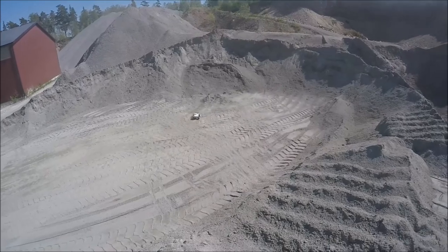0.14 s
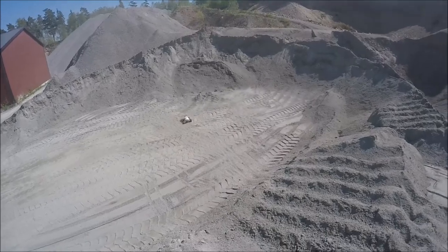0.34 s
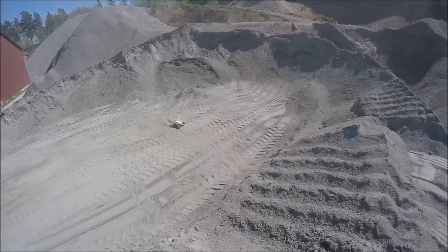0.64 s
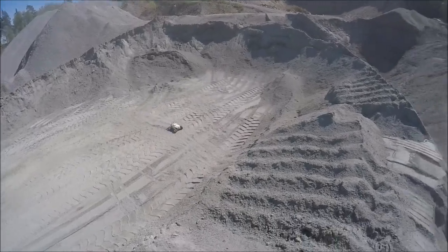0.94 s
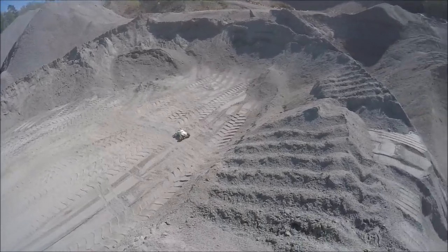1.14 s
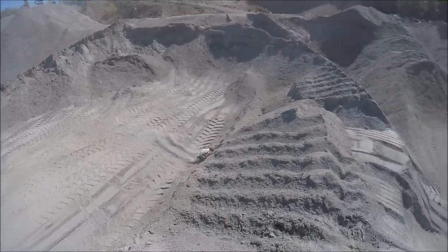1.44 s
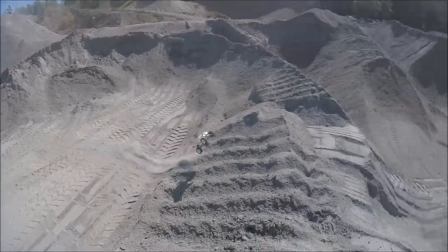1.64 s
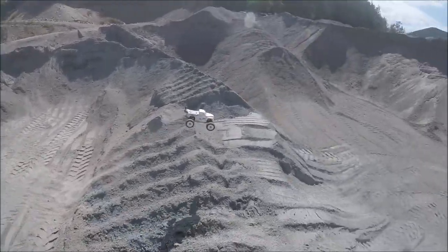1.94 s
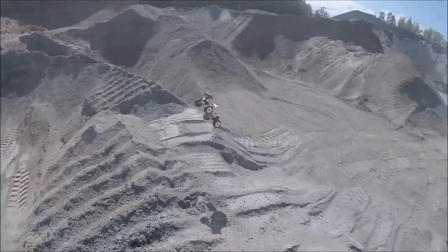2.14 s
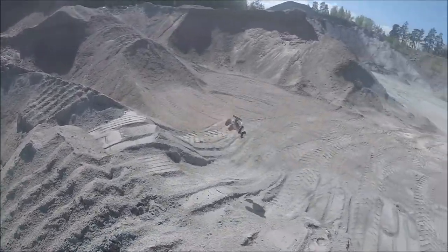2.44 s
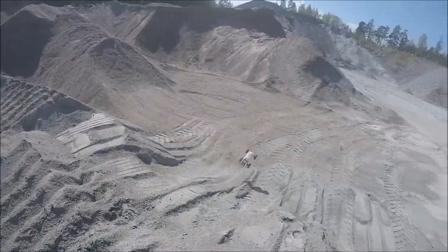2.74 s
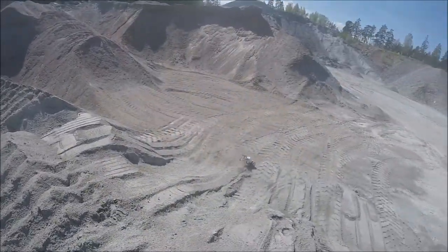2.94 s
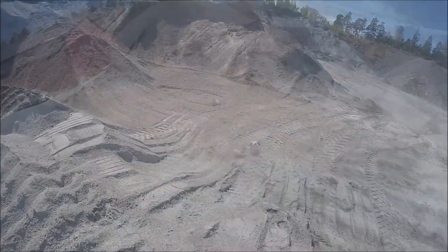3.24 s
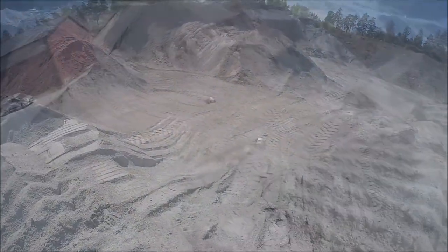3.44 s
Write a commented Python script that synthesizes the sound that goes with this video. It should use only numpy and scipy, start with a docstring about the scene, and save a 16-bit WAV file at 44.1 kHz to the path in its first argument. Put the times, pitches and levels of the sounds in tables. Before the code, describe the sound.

A small electric model truck rattles and whines over gravel as wind buffets the microphone.

```python
"""Wind thuds on the microphone, over a faint hiss, as a small electric model truck rattles over a gravel pit.
The truck jumps a heap with the throttle cut, revs in the air and lands. Impacts of its gear teeth excite
the resonances of the plastic chassis; gears and shafts whine, mostly gliding upward, and the motor
controller gives a thin high squeal under hard throttle. The gravel walls return a short echo, and a
stronger gust sets in near the end."""
import sys
import numpy as np
from scipy import signal
from scipy.fft import rfft, irfft
from scipy.io import wavfile
from scipy.ndimage import uniform_filter1d

SR = 44100
rng = np.random.default_rng(int(sys.argv[2]) if len(sys.argv) > 2 else 0)


def unload_wav(signal):
    """Save mono or channel-first audio to the path in sys.argv[1] as 16-bit WAV at rate SR, clipped to [-1, 1]."""
    wavfile.write(
        sys.argv[1],
        SR,
        np.round(np.clip(np.atleast_2d(signal).T, -1, 1) * 32767).astype(np.int16),
    )


N = 158760

# Midrange chassis modes. Each row: frequency in Hz, bandwidth in Hz, relative gain in dB.
MID_MODES = [(2393, 134, -4.5), (2582, 49, -13.5), (3098, 297, -2.5), (3595, 203, 5), (3776, 481, -1),
             (4106, 280, -5), (4525, 140, -8), (5295, 430, -18.5)]


def amp(db):
    """Amplitude ratio of a level in decibels."""
    return 10 ** (np.asarray(db) / 20)


def unit_rms(x):
    """Normalisation to unit mean power."""
    return x / np.sqrt(np.mean(x ** 2) + 1e-20)


def envelope(table, column):
    """Linear interpolation of one column of a time table at every sample."""
    rows = np.array(table)
    return np.interp(np.arange(N) / SR, rows[:, 0], rows[:, column])


def coloured_noise(spectrum):
    """Spectral shaping of white noise, interpolated over log frequency."""
    corner_hz, db = np.transpose(spectrum)
    hz = np.fft.rfftfreq(N, 1 / SR)
    shape_db = np.interp(np.log(hz + 1), np.log(corner_hz + 1), db, left=-80, right=-80)
    return unit_rms(irfft(rfft(rng.standard_normal(N)) * amp(shape_db), N))


def wobble(seconds):
    """Low-pass noise: a random curve of unit RMS, smooth over the given time."""
    size = max(int(seconds * SR), 1)
    return unit_rms(uniform_filter1d(uniform_filter1d(rng.standard_normal(N), size), size))


def resonate(x, hz, width_hz, stages=2):
    """Heterodyne band-pass: each stage shifts the frequency hz to zero, smooths and shifts back."""
    carrier = np.exp(2j * np.pi * np.cumsum(hz * np.ones(len(x))) / SR)
    pole = np.exp(-np.pi * width_hz / SR)
    for _ in range(stages):
        x = 2 * (carrier * signal.lfilter([1 - pole], [1, -pole], x / carrier)).real
    return x


def hiss(hiss_db=-66, tone_hz=8600, tone_db=-88):
    """Broadband noise is heard as faint hiss, narrowband noise as a thin wavering tone."""
    # Hiss spectrum. Each row: frequency in Hz, relative spectral density in dB.
    spectrum = [(120, -3.5), (200, -9), (488, -9.5), (1130, -15.5), (1780, -17.5), (2510, -17.5),
                (8660, -23.5), (15500, -31.5)]
    tone = resonate(rng.standard_normal(N), tone_hz, width_hz=40, stages=1)
    noise = coloured_noise(spectrum) * amp(1.2 * wobble(0.038))
    return amp(hiss_db) * unit_rms(noise) + amp(tone_db) * unit_rms(tone)


def wind(gust_db=3.5, gust_s=0.023):
    """Turbulent pressure on the microphone gives low thuds and lumpy flutter."""
    # Wind before and during the stronger gust. Each row: time in seconds, thud and flutter levels in dB.
    breeze, gust = [
        [(0.0, -35.5, -62), (0.07, -46, -61.5), (0.78, -40, -60.5), (1.14, -47.5, -59), (1.61, -30.5, -55.5),
         (1.68, -36.5, -58.5), (2.58, -37, -60.5), (2.69, -33, -57), (2.8, -33, -58)],
        [(2.83, -32, -41), (2.872, -27, -38), (2.984, -28.5, -41), (3.008, -36, -39), (3.076, -32, -42),
         (3.16, -20, -43.5), (3.212, -28.5, -48.5), (3.388, -30.5, -40), (3.6, -37, -49)],
    ]
    # Spectra of the two bands. Each row: frequency in Hz, relative spectral density in dB.
    thud_spectrum = [(4.7, -7.5), (8.0, 4.5), (21, 1), (32, -2), (54, -16), (88, -26.5), (120, -65),
                     (160, -60), (200, -80)]
    flutter_spectrum = [(29, -45), (50, 0), (92, -3), (146, -12.5), (269, -20), (439, -25), (600, -48),
                        (780, -127)]
    levels = breeze + gust
    flutter = unit_rms(coloured_noise(flutter_spectrum) * amp(gust_db * wobble(gust_s)))
    thuds = coloured_noise(thud_spectrum)
    return amp(envelope(levels, 1)) * thuds + amp(envelope(levels, 2)) * flutter


def buffets(settle_hz=26, settle_s=.01):
    """Abrupt pushes of wind on the microphone are damped oscillations that sag in pitch."""
    # Each row: start in seconds, peak level in dB, initial frequency in Hz, 60 dB decay time in seconds.
    pushes = [(2.823, -21, 75, .07), (3.003, -15.5, 44, .4)]
    out, t = np.zeros(N), np.arange(SR // 3) / SR
    for start, db, hz, t60 in pushes:
        first = round(start * SR)
        cycles = settle_hz * t + (hz - settle_hz) * settle_s * (1 - np.exp(-t / settle_s))
        out[first:first + len(t)] += amp(db - 60 * t / t60) * np.sin(2 * np.pi * cycles)
    return out


def pit_echo(direct, echo_db=-15.5, t60_s=0.15, delay_s=.008):
    """Diffuse reflection from the gravel walls adds an exponentially decaying tail."""
    t = np.arange(SR // 2) / SR
    tail = rng.standard_normal(len(t)) * amp(-60 * t / t60_s) * (t > delay_s)
    return direct + amp(echo_db) * signal.fftconvolve(direct, tail / np.linalg.norm(tail))[:N]


def chassis(force, modes, swell_db=2.2, wander_s=.03):
    """Modal superposition: resonances of alternating sign swell and fade at random as the truck turns."""
    out = np.zeros(N)
    for k, (centre_hz, width_hz, db) in enumerate(modes):
        hz = centre_hz * (1 + .012 * wobble(wander_s))
        gain = (-1) ** k * amp(db + swell_db * wobble(wander_s))
        out += gain * resonate(force, hz, 1.7 * width_hz)  # two wide stages make one narrower peak
    return unit_rms(out)


def jolts(decay_s=.004):
    """Shock excitation: each jolt is a fast-decaying burst of noise coloured by the chassis modes."""
    # Each row: start in seconds, initial level in dB.
    shocks = [(.32, -55.5), (0.433, -48.5), (1.9402, -54), (2.0033, -58.5), (2.0986, -64), (2.2913, -54),
              (2.368, -37.5), (2.4987, -35), (2.928, -39)]
    t, noise = np.arange(N) / SR, rng.standard_normal(N)
    bursts = sum(amp(db) * (t > start) * np.exp(-np.maximum(t - start, 0) / decay_s)
                 for start, db in shocks)
    return bursts * chassis(noise, MID_MODES)


def controller_squeal(hz=15080, width_hz=220, ramp_s=.02):
    """Switching in the motor controller gives a high narrowband fizz under hard throttle."""
    # Each row: start in seconds, duration in seconds, level in dB.
    spells = [(1.374, 0.31, -68), (2.38, .44, -65), (3.098, 0.16, -70)]
    t = np.arange(N) / SR
    gate = sum(amp(db) * np.clip(np.minimum(t - start, start + length - t) / ramp_s, 0, 1)
               for start, length, db in spells)
    fizz = resonate(rng.standard_normal(N), hz, width_hz)
    return gate * unit_rms(fizz * amp(2.1 * wobble(0.014)))


def whines(rasp_hz=4200, rasp_glide_hz=450):
    """Periodic motion of gears and shafts gives tones; the higher and the wider the glide, the raspier."""
    # Each row: start and duration in seconds, first and last frequency in Hz, level in dB.
    glides = [(0.543, 0.13, 2334, 2557, -58.5), (0.594, 0.37, 7400, 7840, -68.5),
              (1.103, .08, 6670, 6200, -64.5), (1.22, 0.092, 8700, 12700, -72),
              (1.316, 0.12, 4300, 7900, -53.5), (1.32, 0.29, 1450, 1493, -55.5),
              (1.368, 0.42, 7050, 7400, -54), (1.374, 0.078, 2410, 3130, -46.5),
              (1.454, 0.17, 3770, 4020, -41.5), (1.458, 0.062, 4490, 4600, -40.5),
              (1.659, 0.1, 1069, 1013, -53.5), (1.643, 0.08, 4570, 4400, -45.5),
              (1.697, 0.11, 3040, 2970, -55.5), (2.393, 0.16, 1283, 1510, -48),
              (2.408, 0.07, 6820, 7350, -42.5), (2.42, 0.2, 3480, 3550, -40.5),
              (2.447, 0.041, 7400, 10100, -52.5), (2.435, 0.11, 509, 691, -51.5),
              (2.476, 0.088, 1613, 1716, -46), (2.753, 0.057, 3970, 4180, -47.5),
              (3.117, 0.07, 4600, 9300, -47.5), (3.164, 0.056, 2350, 2300, -50.5)]
    out = np.zeros(N)
    noise = rng.standard_normal(N)
    for start, length, from_hz, to_hz, db in glides:
        first, n = round(start * SR), round(length * SR)
        progress = np.arange(n) / n
        hz = from_hz + (to_hz - from_hz) * progress
        glide_hz = abs(to_hz - from_hz)
        rasp = unit_rms(resonate(noise[first:first + n], hz, width_hz=.027 * from_hz + .16 * glide_hz))
        rasp_gain = (from_hz / rasp_hz) ** 3 + glide_hz / rasp_glide_hz + .6
        tone = np.sin(2 * np.pi * np.cumsum(hz) / SR)
        swell = np.sin(np.pi * progress ** .7) ** .7
        out[first:first + n] += amp(db) * swell * unit_rms(tone + rasp_gain * rasp)
    return out * amp(1.5 * wobble(.008))


def gear_rattle(teeth_per_s=5000, spread_db=1.5, clump_db=1, clump_s=0.0075):
    """Impulse excitation: dense, uneven clicks of the gear teeth ring the chassis in four bands."""
    # Each row: time in seconds, midrange level in dB, low band and treble in dB relative to it.
    drive = [(0.01, -56, -16.5, -16), (0.15, -70, -5, -16), (0.17, -51, -15, -20),
             (0.265, -56.5, -14.5, -16), (0.29, -65, -11, -13), (0.415, -68.5, -6, -10),
             (0.44, -53.5, -12, -16.5), (0.62, -53.5, -11, -16.5), (0.76, -48.5, -14, -17.5),
             (0.83, -48, -14.5, -17), (1.21, -52, -12, -15.5), (1.33, -45, -15, -15.5),
             (1.38, -42, -10, -12.5), (1.45, -37, -11.5, -14), (1.57, -39.5, -15.5, -11.5),
             (1.59, -44, -10, -10), (1.69, -36, -17, -19), (1.82, -74.5, 3, -10), (2.31, -76, -2.5, -8),
             (2.35, -43.5, -9.5, -30), (2.38, -36.5, -13.5, -16), (2.41, -41.5, -19, -14.5),
             (2.44, -31.5, -17.5, -15), (2.51, -34.5, -17, -14.5), (2.57, -39, -9.5, -15),
             (2.72, -47, -5, -13.5), (2.78, -38.5, -12, -19), (2.835, -47.5, -5, -16.5),
             (2.905, -63.5, 2, -11.5), (2.922, -42.5, -5.5, -14.5), (3.05, -50.5, -6.5, -15),
             (3.12, -41.5, -11.5, -11), (3.22, -42.5, -9, -12), (3.35, -48, -6.5, -10.5),
             (3.43, -47.5, -10.5, -16), (3.6, -47, -8.5, -15.5)]
    # Highest band, brightest on the approach. Each row: time in seconds, dB relative to the treble.
    brightness = [(0, -11), (.8, -4.5), (1.6, -7), (2.5, -8), (3.1, -7)]
    # Chassis modes by band. Each row: frequency in Hz, bandwidth in Hz, relative gain in dB.
    low_modes = [(462, 325, 0.5), (1001, 216, 4), (1407, 206, 4.5), (1656, 163, 3.5), (2083, 203, 2)]
    treble_modes = [(5985, 230, 5.5), (6794, 280, 9), (7480, 176, 7), (8520, 460, 1.5), (9320, 290, 1)]
    highest_modes = [(10050, 350, -1.5), (11580, 430, 0), (12700, 250, 1), (13900, 1800, -9.5)]
    clicks = (rng.random(N) < teeth_per_s / SR) * rng.choice([-1., 1.], N)
    strength_db = spread_db * np.minimum(rng.exponential(1, N), 4)
    clicks *= amp(strength_db + clump_db * wobble(clump_s))
    mid_db = envelope(drive, 1)
    low_db = mid_db + envelope(drive, 2)
    treble_db = mid_db + envelope(drive, 3)
    highest_db = treble_db + envelope(brightness, 1)
    return (amp(mid_db) * chassis(clicks, MID_MODES)
            + amp(low_db) * chassis(clicks, low_modes)
            + amp(treble_db) * chassis(clicks, treble_modes, swell_db=2.8)
            + amp(highest_db) * chassis(clicks, highest_modes, swell_db=2.8))


def scene():
    """Superposition of the truck, its echo, wind and hiss in one channel."""
    truck = gear_rattle() + whines() + controller_squeal() + jolts()
    return (pit_echo(truck) + wind() + buffets() + hiss())[None]


def record(dry, cutoff_hz=15330):
    """Band limiting by a steep linear-phase low-pass filter."""
    lowpass = signal.firwin(511, cutoff_hz, window=("kaiser", 9), fs=SR)
    return signal.oaconvolve(dry, lowpass[None], "same")


dry = scene()
out = record(dry)
unload_wav(out)
```